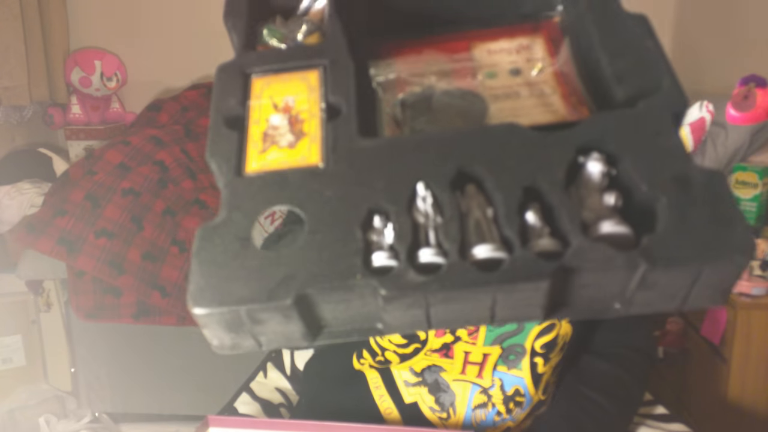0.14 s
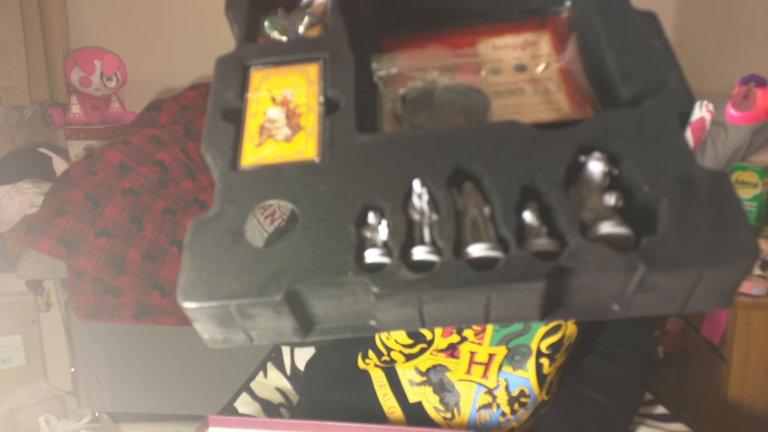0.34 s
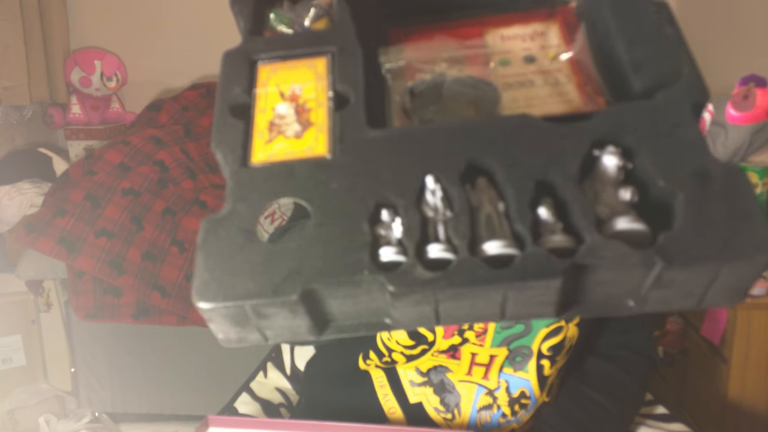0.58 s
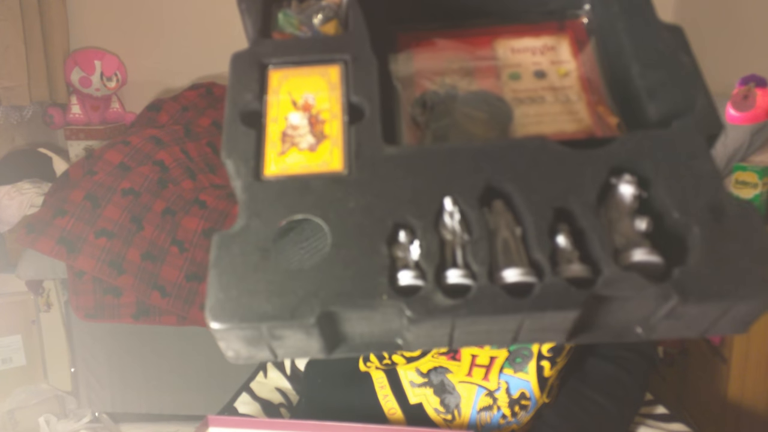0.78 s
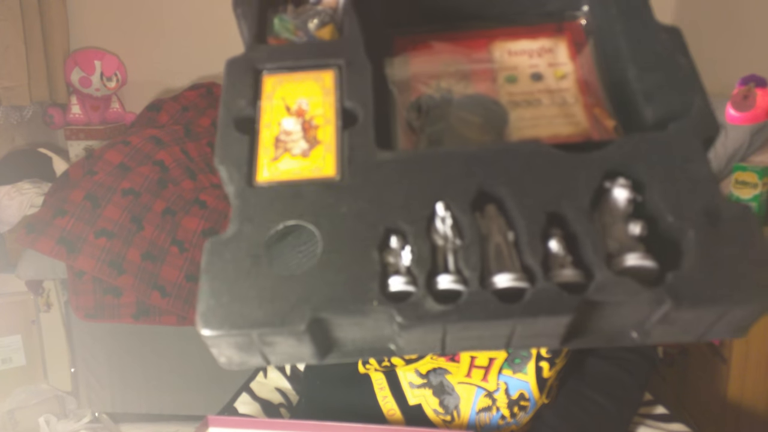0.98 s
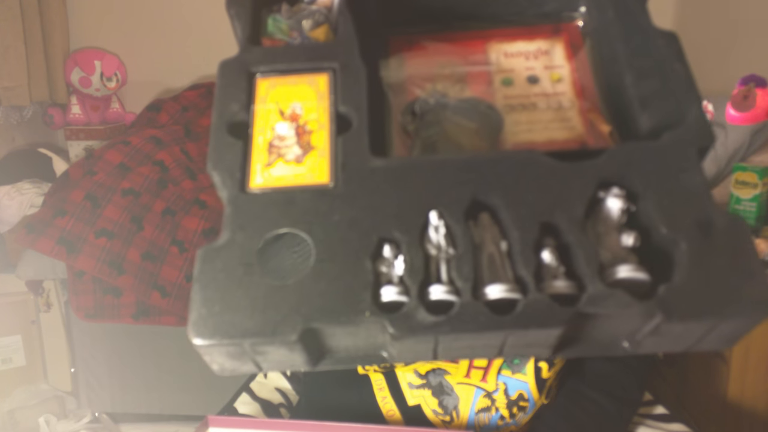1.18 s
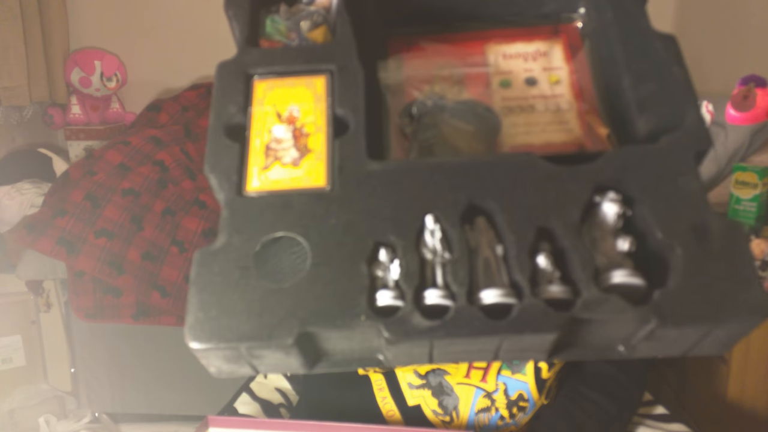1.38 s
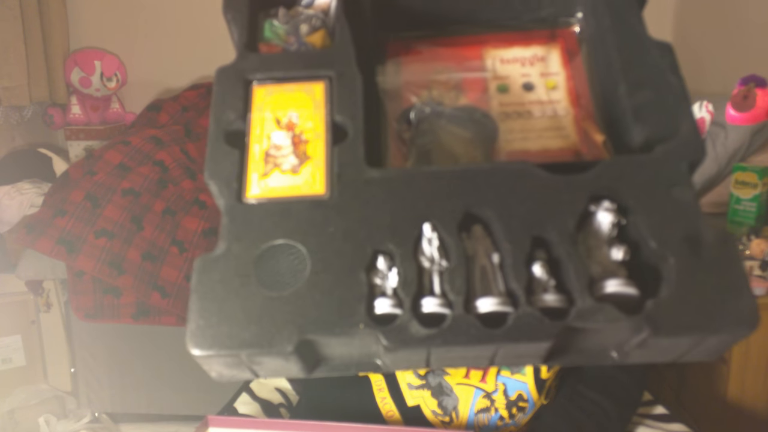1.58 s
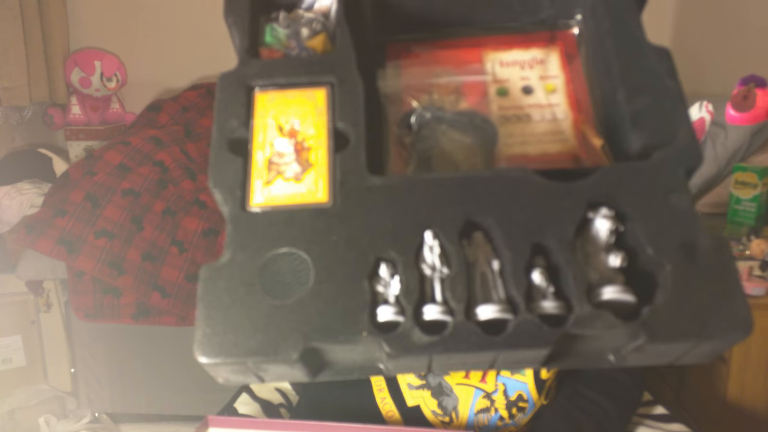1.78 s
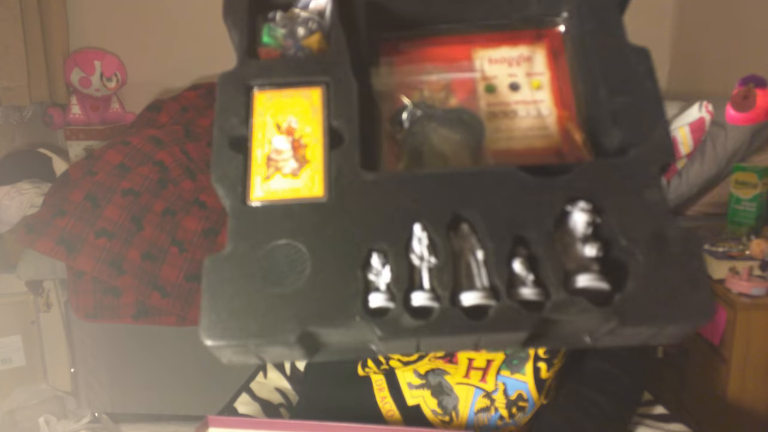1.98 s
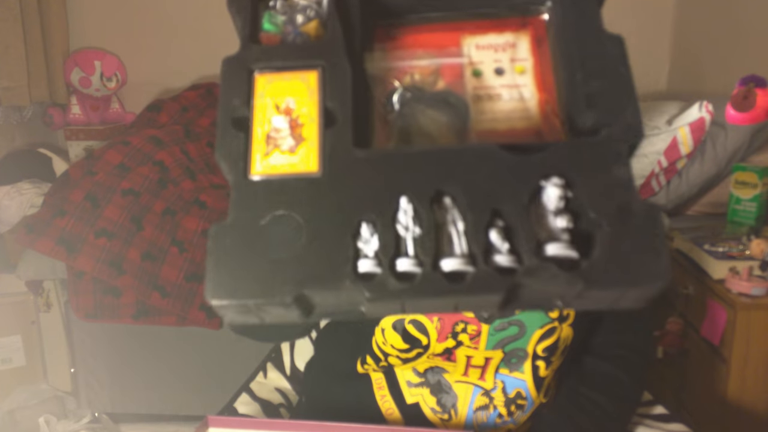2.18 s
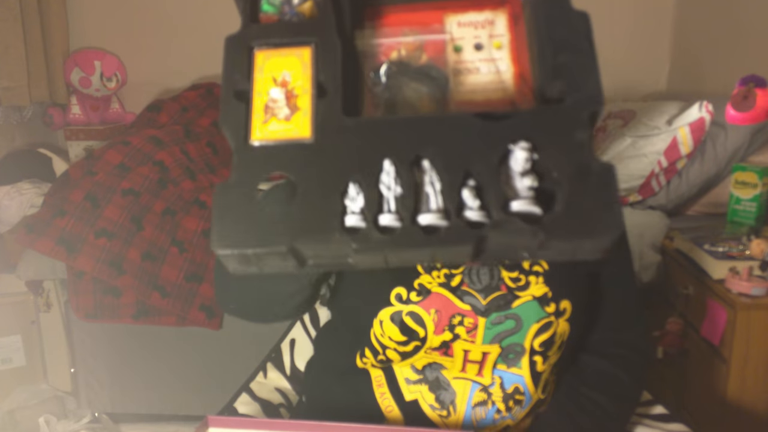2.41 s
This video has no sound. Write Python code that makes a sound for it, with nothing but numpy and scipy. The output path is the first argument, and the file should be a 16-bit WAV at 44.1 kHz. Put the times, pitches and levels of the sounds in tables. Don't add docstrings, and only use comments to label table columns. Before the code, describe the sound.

Handling of a foam tray in a cardboard box: hard early clack, light clicks, dry foam scraping

```python
import sys
import numpy as np
from scipy import signal
from scipy.fft import rfft, irfft
from scipy.io import wavfile
from scipy.ndimage import uniform_filter1d

SR = 44100
rng = np.random.default_rng(int(sys.argv[2]) if len(sys.argv) > 2 else 0)


def materialize(psi):
    bounded = np.clip(np.atleast_2d(psi).T, -1, 1)
    quanta = np.round(bounded * 32767).astype(np.int16)
    wavfile.write(sys.argv[1], SR, quanta)


def to_linear_factor(level_db):
    exponent = np.asarray(level_db, float) / 20
    return 10 ** exponent


N = 108045

# pitch_hz, level_db, t60_s
BOX_MODES = [(210, -8, 0.11), (254, -4.5, 0.079), (302, -2.5, 0.057), (365.3, -1, 0.065),
             (456, -7.5, 0.078), (558.3, -8, 0.062)]
# pitch_hz, level_db, t60_s
TRAY_MODES = [(650, -0.5, 0.014), (797, -0.5, 0.019), (896, -1.5, 0.015), (1004, -3, 0.02),
              (1350, 4, 0.013), (1464, 0, 0.029), (1617, 2, 0.013), (1929, -2.6, 0.025), (2180, 4, 0.007)]


def level(x, db):
    return x * to_linear_factor(db) / np.sqrt(np.mean(x ** 2))


def conv(x, h):
    return signal.fftconvolve(x, h)[:N]


def walk(rate_hz):
    hold = int(SR / rate_hz)
    steps = np.repeat(rng.standard_normal(N // hold + 1), hold)
    curve = uniform_filter1d(uniform_filter1d(steps, hold), hold)[:N]
    return curve / curve.std()


def ring(modes, detune=0., weight_db=0., sign=-1):
    t = np.arange(SR // 4) / SR
    detunes = np.zeros(len(modes)) + detune
    weights_db = np.zeros(len(modes)) + weight_db
    h = np.zeros(len(t))
    for k, (hz, db, t60) in enumerate(modes):
        decay = to_linear_factor(db + weights_db[k] - 60 * t / t60)
        h += sign ** k * decay * np.sin(2 * np.pi * hz * (1 + detunes[k]) * t)
    low_cut_hz = 215
    h = signal.sosfilt(signal.butter(4, low_cut_hz, "highpass", fs=SR, output="sos"), h)
    return h / np.sqrt(np.sum(h ** 2))


def swell(start, peak, end):
    fall_db, fall_bend = 19, 1.83
    t = np.arange(N) / SR
    rise = np.sin(np.pi / 2 * np.clip((t - start) / max(peak - start, 1e-3), 0, 1))
    fall = np.clip((t - peak) / max(end - peak, 1e-3), 0, 4) ** fall_bend
    return rise * to_linear_factor(-fall_db * fall)


def grains(spread_db):
    size = np.repeat(rng.exponential(size=N // 8 + 1), 8)[:N]
    return level(rng.standard_normal(N) * to_linear_factor(spread_db * size), 0)


def knocks():
    # start_s, box_db, tray_db, spot_octaves (above 1 kHz), contact_ms
    contacts = [(0.22, -24, -28, 0.2, 1.6), (.238, -26, -53, 2.5, 3.9), (0.244, -39.5, -45, 1.85, 6),
                (0.3618, -34, -25, 0.68, 2.5), (0.9028, -50, -36, 0, 1.1), (0.9195, -50, -45, 0.1, 1.4),
                (1.098, -67, -56, 0.76, 6), (1.296, -50.5, -48.5, 0.73, 8), (1.369, -54, -52, 0.8, 11),
                (1.558, -56, -46, 1.7, 5), (1.670, -39, -37, 1.1, 8.3), (1.961, -40.5, -35, -0.37, 3.6),
                (1.978, -41, -54, -0.5, 5.7), (2.1405, -46, -33, 1.35, 3), (2.158, -50, -35, 1.5, 4),
                (2.301, -85, -47, 1.46, 7.9)]
    # start_s, tray_db, spot_octaves (above 1 kHz), contact_ms
    light_ticks = [(0.223, -31.5, 0.89, 5.6), (.128, -57.5, 0.12, 3.4), (0.223, -45, 2.9, 7.4),
                   (.301, -40, 3.08, 7.2), (0.317, -48, 3.2, 8.1), (.355, -44, 1.2, 5),
                   (.358, -36, 1.1, 1.1), (.363, -43.5, 2.5, 3), (.3675, -36.5, 0.47, 2.7),
                   (0.674, -42, 0.25, 5.8), (.9245, -54.5, 2.3, 2.7), (0.9585, -48.5, 2.1, 5),
                   (.961, -61, 1, 2.6), (1.166, -44.5, 0.88, 6.2), (1.485, -42.5, 1.1, 20.5),
                   (1.962, -40.5, 2.6, 4.83), (2.054, -44.5, 1.45, 5.485), (2.1455, -28.5, 1.44, 2.51),
                   (2.152, -49, 1.14, 1.9), (2.164, -56, 2, 2.7), (2.181, -63, 3.2, 3),
                   (2.325, -50, 0.55, 3.6)]
    # pitch_hz, level_db, t60_s
    piece_modes = [(2414, 7.5, 0.016), (2552, 6.5, 0.016), (3210, 0.5, 0.026), (3720, 4, 0.0086),
                   (4970, -7, 0.0045), (5660, -3.5, 0.0069), (7360, -6, 0.0046), (9560, -0.5, 0.0016),
                   (11400, -3, 0.004), (12600, -0.5, 0.0044)]
    spot_width_octaves, skirt_db = 0.46, -20
    blow, detune = 0.64, 0.024
    tick_box_db = -20

    out = np.zeros(N + SR)
    t = np.arange(2048) / SR
    upper = TRAY_MODES + piece_modes
    octaves = np.log2(np.array(upper)[:, 0] / 1000)
    ticks = [(s, db + tick_box_db, db, spot, ms) for s, db, spot, ms in light_ticks]
    for s, box_db, tray_db, spot, ms in contacts + ticks:
        z = rng.standard_normal((2, 2048 + 32))
        chatter = z[:, 32:] * t * np.exp(-t * 2000 / ms)
        chatter /= np.sqrt(np.sum(chatter ** 2, axis=1, keepdims=True))
        chatter[:, int(ms * SR / 4000)] += blow
        near_spot = np.exp(-((octaves - spot) / spot_width_octaves) ** 2)
        weight_db = 20 * np.log10(near_spot + to_linear_factor(skirt_db))
        box_ring = ring(BOX_MODES, detune * z[0, :len(BOX_MODES)], sign=1)
        tray_ring = ring(upper, detune * z[1, :len(upper)], weight_db)
        hit = to_linear_factor(box_db + 21) * signal.fftconvolve(chatter[0], box_ring)
        hit += to_linear_factor(tray_db + 20) * signal.fftconvolve(chatter[1], tray_ring)
        first = int(s * SR)
        out[first:first + len(hit)] += hit
    return out[:N]


def thuds():
    # start_s, level_db, pitch_hz, t60_s
    bumps = [(.2197, -16, 339, 0.053), (.222, -31, 556, 0.11), (1.185, -44.5, 426, 0.18),
             (.363, -30, 308, .09), (.364, -41.5, 570, 0.17), (0.9, -35.5, 468, 0.029),
             (0.917, -39.5, 430, 0.056), (1.564, -55, 123, 0.58), (1.672, -41.5, 93.8, 0.17),
             (1.69, -40, 210, 0.098), (1.724, -43, 135, 0.12), (1.962, -33, 147, 0.058),
             (2.13, -41.5, 120, 0.07), (2.191, -47, 182, 0.144), (2.249, -40, 142.8, 0.089),
             (2.291, -41.5, 251.5, 0.15), (2.385, -32, 210, 0.026), (2.421, -40, 248, 0.023)]
    t = np.arange(N) / SR
    out = np.zeros(N)
    for start, db, hz, t60 in bumps:
        late = np.clip(t - start, 0, None)
        onset = 1 - np.exp(-late / 0.0024)
        out += to_linear_factor(db + 1.5 - 60 * late / t60) * onset * np.sin(2 * np.pi * hz * late)
    return out


def slides():
    # start_s, peak_s, end_s, level_db, brightness_db_per_octave (around 4 kHz)
    strokes = [(0.219, 0.215, 0.39, -51.5, 1.5), (0.353, 0.352, .45, -53, -4.5),
               (0.666, 0.679, 0.83, -45.5, -1), (0.856, 0.888, 1.05, -64, 5),
               (1.074, 1.206, 1.317, -57.5, 4.5), (1.326, 1.458, 1.49, -58, 5.5),
               (1.476, 1.489, 1.57, -58, 8), (1.545, 1.6, 1.69, -49, 3), (1.635, 1.722, 1.846, -36, -0.24),
               (1.795, 1.848, 1.95, -55, -0.5), (1.942, 1.994, 2.025, -53.5, -0.5),
               (2.047, 2.095, 2.2, -53, 2), (2.131, 2.148, 2.2, -45.5, 4),
               (2.252, 2.313, 2.335, -61.5, 3.5), (2.405, 2.44, 2.45, -62.5, -8)]
    # centre_hz, width_hz, level_db
    foam = [(1440, 810, -5), (2360, 640, -1), (2820, 1700, 0), (3600, 690, 0.5), (4338, 1410, 4),
            (5700, 1500, -5), (6560, 2500, -3.5), (7840, 2450, -7), (8900, 1000, -4.5), (10360, 2200, -5),
            (12270, 3700, -9.5), (14800, 2200, -9.5)]
    # centre_hz, width_hz, level_db
    air_gap = [(1000, 430, -8), (1780, 270, -15), (2400, 300, 1.5), (3050, 450, -10), (3510, 51, 2),
               (3920, 26, -7), (4500, 80, -14), (4900, 86, 5), (6040, 97, 6), (6500, 65, 3), (7000, 54, 3),
               (7550, 550, -4), (8910, 92, 2)]
    grain_db, flutter_db, fine_db, patchy_db = 1.8, 1.2, -6, 2.5
    lift_s = 1.45

    f = np.fft.rfftfreq(N, 1 / SR)
    t = np.arange(2048) / SR
    scatter = rng.standard_normal(2048) * to_linear_factor(-60 * t / 0.038) * to_linear_factor(fine_db - 22.5)
    fine = rfft(scatter + (t == 0), N)
    source = rfft(grains(grain_db) * to_linear_factor(flutter_db * walk(200))) * fine
    shapes = [swell(*stroke[:3]) for stroke in strokes]
    out = np.zeros(N)
    for hz, width, db in foam:
        band = irfft(source / (1 + ((f - hz) / (width / 2)) ** 2) ** 2, N)
        push = np.zeros(N)
        for shape, (_, _, _, stroke_db, tilt_db) in zip(shapes, strokes):
            push += shape * to_linear_factor(stroke_db + tilt_db * np.log2(hz / 4000))
        out += band * push * to_linear_factor(db + 3.0 + patchy_db * walk(28.5))

    lifted = np.arange(N) > lift_s * SR
    gap_db = sum(db * np.exp(-(2 * (f - hz) / width) ** 2) for hz, width, db in air_gap)
    return out * ~lifted + irfft(rfft(out * lifted) * to_linear_factor(gap_db), N)


def rubs():
    # start_s, peak_s, end_s, box_db, tray_db
    creeps = [(0.225, 0.19, .33, -39, -42.5), (0.362, 0.33, .45, -46, -49.5), (.905, 1, 1.06, -61.5, -63),
              (0.668, 0.59, 0.86, -57, -51.5), (1.056, 1.13, 1.476, -58, -57.5),
              (1.164, 1.202, 1.233, -45.5, -62.5), (1.376, 1.42, 1.62, -64, -59.5),
              (1.563, 1.515, 1.82, -54, -51), (1.651, 1.664, 1.95, -52, -53.5),
              (2.034, 2.08, 2.244, -50.5, -60), (2.114, 2.145, 2.183, -43, -47),
              (2.165, 2.28, 2.386, -56.5, -65.5), (2.282, 2.323, 2.88, -65, -69)]
    grain_db = 1.5
    out = np.zeros(N)
    for column, body in ((3, BOX_MODES), (4, TRAY_MODES)):
        push = sum(swell(*creep[:3]) * to_linear_factor(creep[column]) for creep in creeps)
        uneven = level(to_linear_factor(grain_db * walk(90)), 0)
        out += conv(rng.standard_normal(N) * push * uneven, ring(body))
    return out


def hands():
    # time_s, level_db
    grip = [(0.0, -62), (0.25, -48.5), (0.28, -54), (1.63, -60), (1.66, -47.5), (1.77, -53.5), (1.79, -61),
            (2.219, -43.5), (2.26, -67.5), (2.321, -38.5), (2.39, -48), (2.45, -42.5)]
    band = signal.butter(2, [22, 48], "bandpass", fs=SR, output="sos")
    low = signal.sosfilt(band, rng.standard_normal(N))
    return level(low, 0) * to_linear_factor(np.interp(np.arange(N) / SR, *np.array(grip).T))


def room():
    t60_s, gap_s, room_db = .22, .006, -13
    low_hz, top_hz = 600, 5500
    t = np.arange(SR // 2) / SR
    after_gap = t > gap_s
    spectrum = rfft(rng.standard_normal(len(t)) * to_linear_factor(-60 * t / t60_s) * after_gap)
    spectrum /= np.sqrt(uniform_filter1d(np.abs(spectrum) ** 2, size=25))
    tail = irfft(spectrum, len(t)) * after_gap
    tail = signal.lfilter(*signal.butter(1, [low_hz, top_hz], "bandpass", fs=SR), tail)
    tail *= np.clip(2 - t / t60_s, 0, 1)
    return tail * to_linear_factor(room_db) / np.sqrt(np.sum(tail ** 2))


def tone(hz, db):
    return np.sqrt(2) * to_linear_factor(db) * np.sin(2 * np.pi * np.cumsum(hz) / SR)


def lens_motor():
    # start_s, end_s, start_hz, end_hz
    bursts = [
        (0, .105, 10830, 10880),
        (.105, .158, 11000, 10980),
        (.158, .192, 10840, 10870),
        (.192, .22, 11000, 11020),
        (.885, .97, 10970, 10995),
        (1.89, 1.97, 10870, 11000),
    ]
    motor_db, wobble_hz = -68.5, 12
    t = np.arange(N) / SR
    out = np.zeros(N)
    for start, end, start_hz, end_hz in bursts:
        on = uniform_filter1d(1. * (t > start) * (t < end), size=300)
        hz = np.interp(t, [start, end], [start_hz, end_hz]) + wobble_hz * walk(38)
        out += on * tone(hz, motor_db + 2.0 * walk(40.6))
    return out


def fan():
    return tone(121 + 1.5 * walk(9.06), -63.5 + .8 * walk(9.7))


def scan_whine():
    return tone(15000 + 10 * walk(9), -86)


def hiss():
    # frequency_hz, density_db
    noise_colour = [(76, -10.5), (130, 1), (147, -15.5), (183, -14.5), (248, -23.5), (6090, -31),
                    (10100, -25), (10700, -27.5), (16000, -27.5)]
    f = np.fft.rfftfreq(N, 1 / SR) + 1
    hz, db = np.array(noise_colour).T
    colour = to_linear_factor(np.interp(np.log(f), np.log(hz), db)) * np.clip(f / 60, 0, 1)
    noise = irfft(rfft(rng.standard_normal(N)) * colour, N)
    return level(noise, -57.5) * to_linear_factor(0.48 * walk(3.07))


def scene():
    near = knocks() + slides() + rubs()
    background = lens_motor() + fan() + scan_whine() + hiss()
    return (near + conv(near, room()) + thuds() + hands() + background)[None]


def low_pass(x):
    return signal.sosfilt(signal.butter(12, 15850, fs=SR, output="sos"), x)


def record(dry):
    top_cut = signal.ellip(12, .2, 80, 15790, fs=SR, output="sos")
    mix = signal.sosfilt(top_cut, dry) - .0005
    return low_pass(mix)


dry = scene()
out = record(dry)
materialize(out)
```